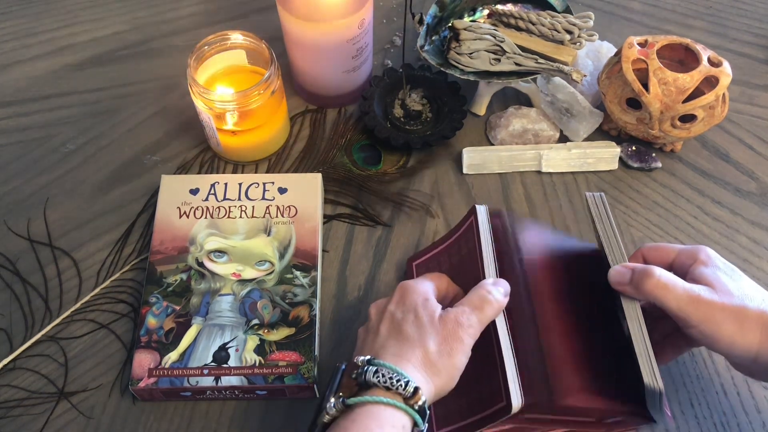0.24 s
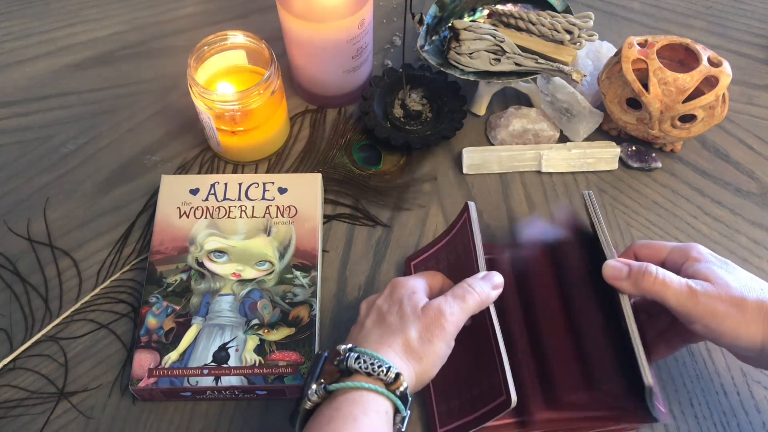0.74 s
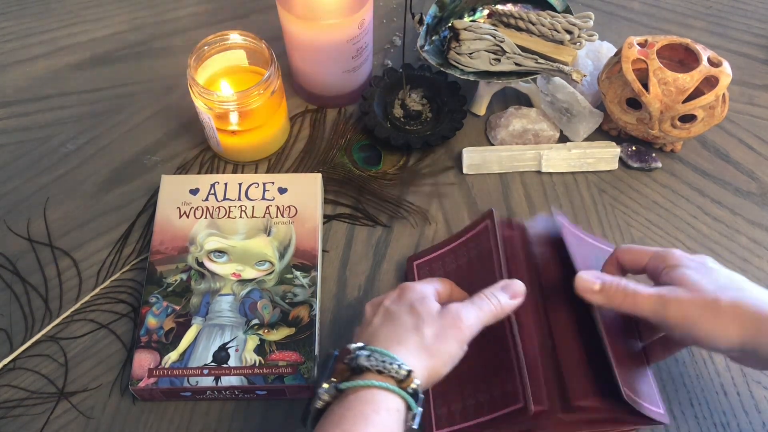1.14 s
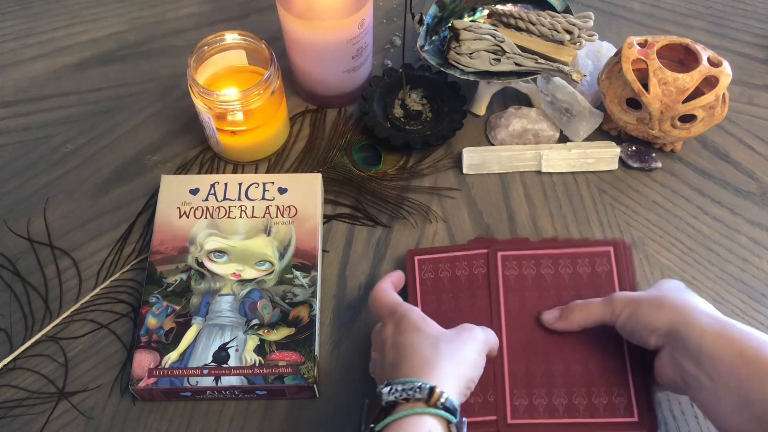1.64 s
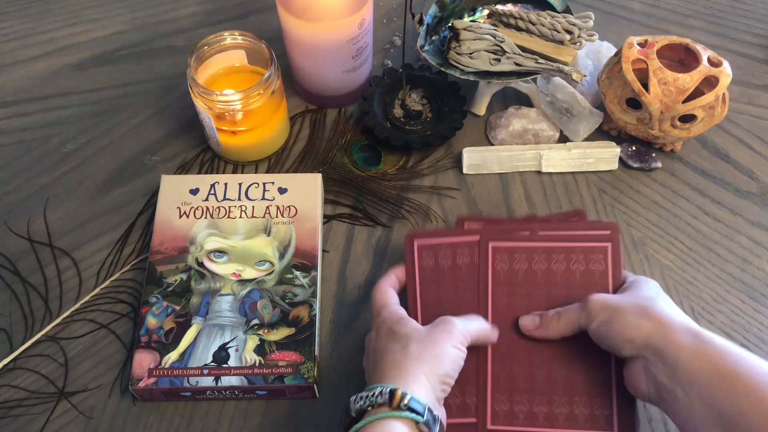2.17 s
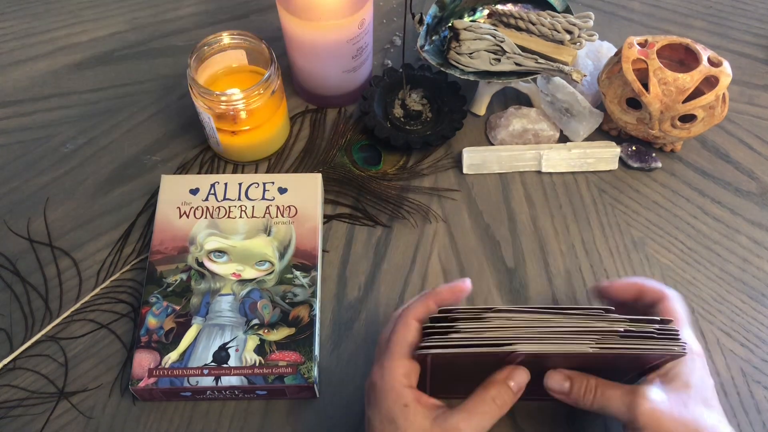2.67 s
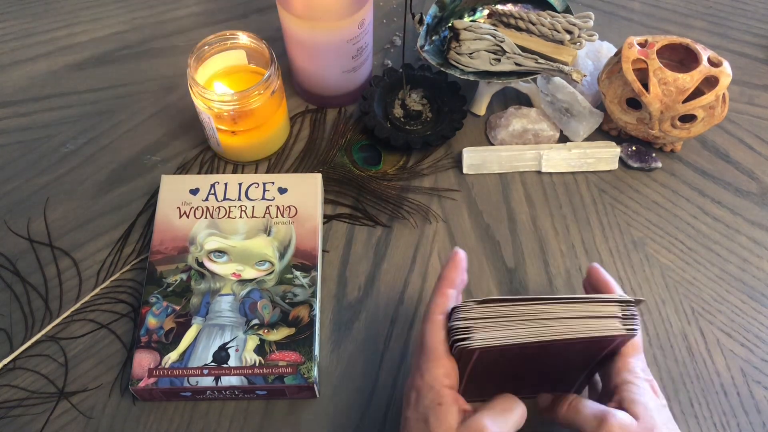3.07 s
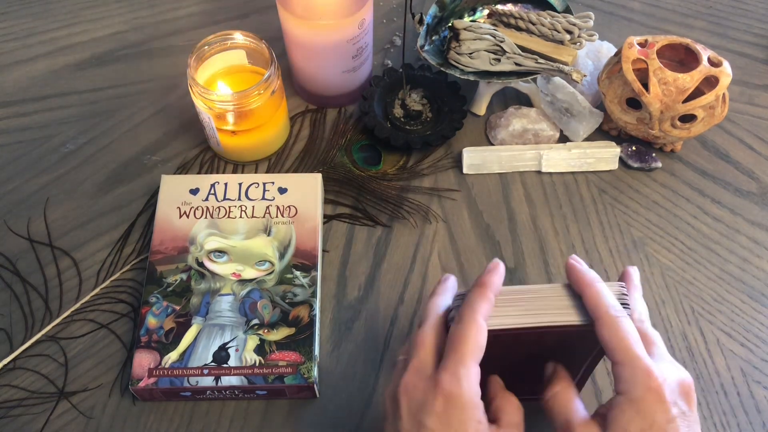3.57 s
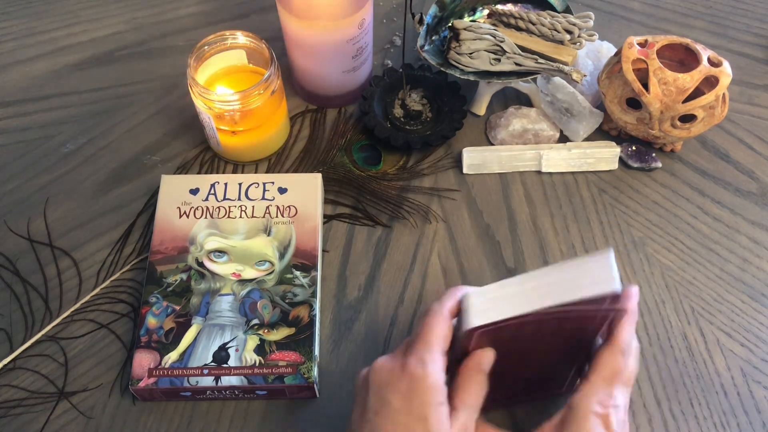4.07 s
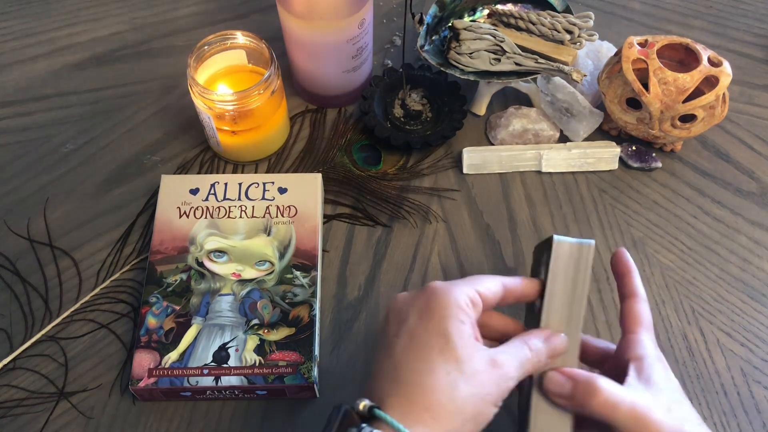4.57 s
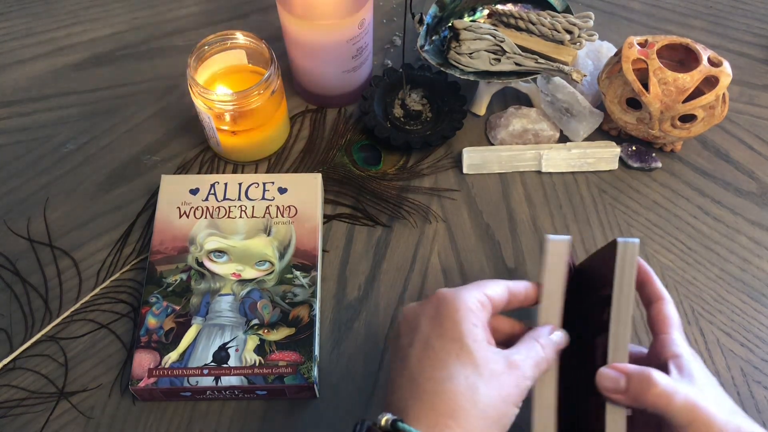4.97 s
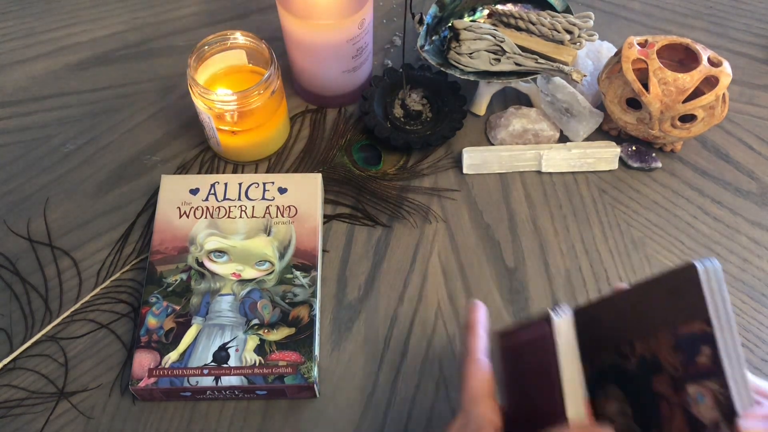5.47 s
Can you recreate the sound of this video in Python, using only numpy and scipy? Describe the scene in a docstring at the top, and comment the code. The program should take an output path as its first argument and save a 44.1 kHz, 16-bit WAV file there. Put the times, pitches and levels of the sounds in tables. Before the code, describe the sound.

A close recording in a quiet furnished room, with a low soft hum and short reflections. From 0 to 1.25 s a deck of large stiff cards is riffled: a sharp cluster of snaps in the first 0.1 s, sparse fainter ticks over papery crackle, a strong snap near 0.7 s, then denser snaps from 0.9 s, climaxing in a bright burst around 1.15-1.25 s with a dull knock. From 1.4 to 2.4 s cards slide together in short gritty swishes, with light taps around 1.5-1.85 s. The loudest wooden knocks come at 2.54-2.6 s and 2.89-3.0 s, with dragging and a brisk papery swish. Weaker taps follow near 3.12, 3.47 and 3.74 s, with small rubs. After 4 s there is a soft tick at 4.14 s, near silence, then light card slides at 5.0-5.45 s. Two faint, thin, high whistles sound at about 5.5 and 5.6 s.

```python
"""Sharp card snaps over a rustle: a deck of large cards is riffled together, pushed flush, knocked on a wooden
table and squared by hand. Corners snap off the thumbs as noise bursts with a ringing air pocket; card faces slide
as gritty friction; the deck edge thuds through the table modes and drags on the wood as coloured grit.
Two short faint whistles come near the end. A quiet furnished room and its low hum surround a close microphone."""
import sys
import numpy as np
from scipy import signal
from scipy.fft import rfft, irfft, next_fast_len
from scipy.io import wavfile
from scipy.ndimage import uniform_filter1d

SR = 44100
rng = np.random.default_rng(int(sys.argv[2]) if len(sys.argv) > 2 else 0)


def generate_wav(sig):
    """Save sig (samples, or channels by samples) to the path in sys.argv[1] as 16-bit PCM at SR."""
    pcm = np.round(np.clip(np.atleast_2d(sig).T, -1, 1) * 32767).astype(np.int16)
    wavfile.write(sys.argv[1], SR, pcm)


N = 252252


def gain_of(db):
    """Decibels to amplitude."""
    return 10 ** (np.asarray(db) / 20)


def evened(x):
    """Scales to rms 1."""
    return x / np.sqrt(np.mean(x ** 2) + 1e-20)


def peaked(x):
    """Scales to peak 1."""
    return x / abs(x).max()


def early(x):
    """Scales to rms 1 over the first 10 ms."""
    return x / np.sqrt(np.mean(x[:441] ** 2))


def read(points, hz):
    """Reads a curve over frequency on a log-frequency axis."""
    f, value = np.transpose(points)
    return np.interp(np.log(hz + 1), np.log(f + 1), value)


def along(curve):
    """The gain of a level curve at every sample; silent after its end."""
    s, db = np.transpose(curve)
    return gain_of(np.interp(np.arange(N) / SR, s, db, right=-200))


def add(mix, s, sound):
    """Mixes a sound in at a time in seconds."""
    part = mix[round(s * SR):][:len(sound)]
    part += sound[:len(part)]


def band(x, lo_hz, hi_hz, order=2):
    """Causal band-pass."""
    edges_hz = np.clip([lo_hz, hi_hz], 20, SR / 2 - 500)
    return signal.sosfilt(signal.butter(order, edges_hz, "band", fs=SR, output="sos"), x)


def resonate(x, hz, width_hz):
    """A two-pole resonance of gain 1 at its peak."""
    return signal.lfilter(*signal.iirpeak(hz, hz / max(width_hz, 1), SR), x)


def coloured(x, points):
    """Shapes a long noise by a spectrum and scales it to rms 1."""
    size = next_fast_len(len(x))
    gain = gain_of(read(points, np.fft.rfftfreq(size, 1 / SR)))
    return evened(irfft(rfft(x, size) * gain, size)[:len(x)])


# Spectrum of the room's wash. Each row: frequency in Hz, relative density in dB per Hz.
HUSH_SPECTRUM = [(15, -53), (25, -28), (43, 0.5), (150, 2), (177, -4), (208, 5), (280, -14), (410, -2.5),
                 (617, -17), (902, -16.5), (1930, -21.5), (15200, -27), (16500, -42)]
# Wavering tones in the hush. Each row: frequency in Hz, width in Hz, rms level in dB.
HUM_TONES = [(199, 4.7, -69), (1180, 8.5, -90)]
HUSH_DB, SWELL_DB = -65.5, 1.5


def hush():
    """Background of the room: low wash that swells slowly, up to microphone hiss, and narrow-band noise hums."""
    flutter = band(rng.standard_normal(N), 12, 60, order=1)
    drift = uniform_filter1d(rng.standard_normal(N), 9000)
    swell = evened(flutter + 30 * drift)
    wash = coloured(rng.standard_normal(N), HUSH_SPECTRUM) * gain_of(HUSH_DB + SWELL_DB * swell)
    hums = sum(gain_of(db) * evened(resonate(rng.standard_normal(N), hz, width_hz))
               for hz, width_hz, db in HUM_TONES)
    return wash + hums


# Decay of the room. Each row: frequency in Hz, time to fall 60 dB in s.
ROOM_T60 = [(150, 0.26), (400, 0.17), (1040, 0.35), (2760, 0.31), (7280, 0.25)]


def reflections(x):
    """Sparse echoes of random sign, one in every 20 samples; each frequency dies at its own speed."""
    taps = np.zeros(SR)
    at = np.arange(180, SR - 20, 20)
    taps[at + rng.integers(0, 20, len(at))] = rng.choice([-1., 1.], len(at))
    hz, t, z = signal.stft(taps, SR, nperseg=256)
    decay = gain_of(-60 * t / read(ROOM_T60, hz)[:, None])
    tail = signal.istft(z * decay, SR, nperseg=256)[1]
    return signal.fftconvolve(x, tail / np.linalg.norm(tail))[:N]


def diffuse_field(x):
    """Energy lingers in each frequency band and is carried by fresh noise."""
    hz, t, z = signal.stft(x, SR, nperseg=256, noverlap=192)
    keep = gain_of(-60 * t[1] / read(ROOM_T60, hz)) ** 2  # share of energy kept per frame
    energy = uniform_filter1d(abs(z) ** 2, size=3, axis=0)  # scattering blurs fine spectral detail
    # starts three frames late
    lingering = np.array([signal.lfilter([0, 0, 0, 1 - k], [1, -k], e) for k, e in zip(keep, energy)])
    a, b = rng.standard_normal((2, *z.shape))
    noise = np.sqrt(abs(lingering)) * (a + 1j * b)
    diffuse = signal.istft(noise, SR, nperseg=256, noverlap=192)[1][:N]
    return band(diffuse, 170, 20000, order=4)


def room(x):
    """The furnished room answers with sparse reflections and a diffuse field."""
    return .45 * reflections(x) + diffuse_field(x)


# Thin faint whistle, one list per note. Each row: time in seconds, pitch in Hz, rms level in dB.
WHISTLE_NOTES = [
    [(5.51, 3125, -88), (5.538, 3330, -72), (5.56, 3300, -89)],
    [(5.61, 3410, -71.5), (5.63, 3510, -74), (5.72, 3380, -73.5)],
]


def whistle():
    """Short gliding sines with soft ends."""
    out = np.zeros(N)
    for rows in WHISTLE_NOTES:
        s, hz, db = np.transpose(rows)
        t = np.arange(s[0], s[-1], 1 / SR)
        phase = 2 * np.pi * np.cumsum(np.interp(t, s, hz)) / SR
        tone = np.sin(phase) * np.sqrt(2)  # rms 1
        add(out, s[0], gain_of(np.interp(t, s, db)) * tone * signal.windows.tukey(len(t), .15))
    return out


def grit(per_s, spread_db, smooth):
    """Stick-slip friction: smooth noise plus small catches, of uneven size where spread_db is above 0."""
    sizes = gain_of(spread_db * np.minimum(rng.exponential(1, N), 4))
    catches = sizes * (rng.random(N) < per_s / SR)
    clumps = signal.lfilter([1], [1, -np.exp(-1000 / (1.5 * SR))], catches)  # each catch decays over 1.5 ms
    return evened(rng.standard_normal(N) * (smooth + evened(clumps)))


# Deck and hands dragging on the wood. Each row: time in seconds, level in dB.
DRAG_LEVEL = [(0.0, -59), (0.62, -55), (0.76, -60), (1.13, -54.5), (1.21, -50.5), (1.46, -61.5),
              (2.16, -64), (2.53, -59), (2.69, -50), (2.87, -63), (2.9, -53), (3.06, -51.5), (3.45, -68.5),
              (3.64, -56.5), (4.62, -64), (5.72, -65)]
# Spectrum of the drag. Each row: frequency in Hz, relative density in dB per Hz.
WOOD_SPECTRUM = [(71, -42.5), (120, -7), (189, 0.5), (394, 2.5), (456, 0.5), (484, -2.5), (649, -6.5),
                 (1710, -17), (4000, -32), (5200, -42.5), (8800, -120)]


def drag():
    """The deck edge rasps on the wood: dense grit with the colour of the wood."""
    return along(DRAG_LEVEL) * coloured(grit(per_s=890, spread_db=4.0, smooth=2.6), WOOD_SPECTRUM)


# Modes of the table top. Each row: frequency in Hz, width in Hz (70 at least when played), relative gain in dB.
TABLE_MODES = [(334, 166, 11), (504, 410, -4), (950, 1000, 2.5), (1225, 41, -30), (1320, 210, 10.5),
               (1620, 160, -42), (2220, 54, -52), (2655, 120, -55)]


def table(x):
    """The table top rings in its modes over a broad wooden body; wood swallows the treble."""
    modes = sum((-1) ** k * gain_of(db) * resonate(x, hz, max(width_hz, 70))
                for k, (hz, width_hz, db) in enumerate(TABLE_MODES))
    return band(modes + 1.7 * x, 207, 2480, order=4)


def papery(rub, hiss_db, ring, hz):
    """Friction on coated card: a broad rub, a ring of the bent card and a treble hiss."""
    bending = sum(resonate(rub, share * hz, 0.13 * hz) for share in (.45, .72, 1))  # three modes
    body = evened(band(rub, 1400, 8000)) + ring * evened(bending)
    hiss = evened(band(rub, 5300, 16000)) + 0.22 * evened(band(rub, 12500, 15500))
    return evened(body) + gain_of(hiss_db) * evened(hiss)


# Card faces sliding. Each row: start in seconds, length in seconds, rub level at full speed in dB,
# treble hiss in dB re rub, table rumble in dB re rub, top mode of the bent card in Hz.
SLIDE_STROKES = [(1.3, 1.36, -70, -8, -17, 2970), (1.437, 0.14, -57.5, -5.5, -28, 3420),
                 (1.59, 0.18, -51, 2.5, -18, 6200), (1.9, .09, -58, -3, -1, 3560),
                 (2.013, 0.19, -61.5, -2, 2, 2820), (2.215, 0.12, -60, -5, 1.5, 2730),
                 (2.308, 0.23, -53, -5, -18, 1990), (2.378, 0.098, -58, -33, 8, 4460),
                 (2.5, 0.086, -52.5, -9, -9, 3200), (2.856, .2, -42.5, 0.5, -14, 2690),
                 (3.052, .13, -55, -14, -0.5, 2500), (3.183, 0.061, -69.5, 2, -4, 2580),
                 (3.43, 0.082, -62, 5, 15.5, 2400), (3.506, 0.053, -64.5, 6, 14, 6950),
                 (3.692, 0.088, -54.5, -1.5, 4.5, 2870), (3.79, 0.28, -74, 3, 2, 3530),
                 (4.09, 0.089, -68, -2, 2, 2700), (4.224, 0.14, -65.5, -7, 4.5, 4600),
                 (4.36, 0.18, -80.5, 11.5, 13, 3500), (4.93, .1, -80.5, -10, 3, 2900),
                 (5.068, .11, -64.5, -7, 0, 3470), (5.271, 0.079, -64, -0.5, -21, 1990),
                 (5.348, 0.11, -55.5, -8, -10, 3760)]
FASTEST_AT = 0.5  # share of the stroke
RING_SHARE, RING_DB_PER_HISS_DB = 0.29, -1.1  # a light fast skim hisses, a pressed card rings


def slides():
    """Each stroke speeds up and slows down; loudness follows its speed, and the table under the deck rumbles."""
    out, rub = np.zeros(N), grit(per_s=390, spread_db=0.0, smooth=1.5)
    for start_s, length_s, rub_db, hiss_db, rumble_db, hz in SLIDE_STROKES:
        at = round(start_s * SR) + np.arange(round(length_s * SR))
        angle = np.interp(np.linspace(0, 1, len(at)), [0, FASTEST_AT, 1], [0, np.pi / 2, np.pi])
        speed = np.sin(angle)
        rumble = gain_of(rumble_db) * evened(table(resonate(rub[at], 534, 400)))
        ring = RING_SHARE * gain_of(RING_DB_PER_HISS_DB * hiss_db)
        sound = papery(rub[at], hiss_db, ring, hz) + rumble
        add(out, start_s, gain_of(rub_db) * sound * abs(speed) ** 1.98)
    return out


# Cards fluttering past the thumbs. Each row: time in seconds, rustle gain in dB.
RIFFLE_LEVEL = [(0.03, -70), (0.106, -48), (0.3, -66.5), (0.4, -58), (0.49, -58), (0.52, -52),
                (0.72, -54.5), (0.9, -66.5), (0.91, -47.5), (1.16, -54), (1.337, -55), (1.44, -67.5)]
RIFFLE_HISS_DB = -7  # treble re rustle


def riffle():
    """Fine crackle of card edges between the snaps; gaps of different width ring at different pitch."""
    edges = [grit(per_s=120, spread_db=4.2, smooth=.45) for _ in range(4)]
    pockets = [papery(rub, RIFFLE_HISS_DB, 1.2, hz) for rub, hz in zip(edges, (2020, 3150, 4200, 6500))]
    return along(RIFFLE_LEVEL) * sum(pockets) / 2


def burst(decay_ms, rise_ms):
    """Noise that starts fast and dies exponentially, in clumps as one card lands after another."""
    ms = np.arange(6000) * 1000 / SR
    unevenness = evened(uniform_filter1d(rng.standard_normal(len(ms)), size=50))
    clumps = gain_of(3.35 * unevenness)
    shape = (1 - np.exp(-ms / abs(rise_ms))) * np.exp(-ms / max(decay_ms, .3))
    return rng.standard_normal(len(ms)) * clumps * shape


# Lowest modes of the table top. Each row: frequency in Hz, width in Hz, relative gain in dB.
THUD_MODES = [(157.8, 15, -8.5), (206.2, 27, 1.5)]
KNOCK_CRACK_DB = -32.5  # early rms re body peak


def knock(db, thud_db, hz, decay_ms):
    """Many card edges land close together: a dull burst into the table, a short crack, a low thud of the top."""
    blow = burst(decay_ms, rise_ms=0.074) + 1.54 * burst(0.8, rise_ms=0.075)  # the first edge lands hardest
    deck_ring = resonate(resonate(blow, hz, 0.21 * hz), hz, 0.21 * hz)
    body = peaked(table(blow)) + 0.4 * peaked(deck_ring)
    crack = early(band(burst(0.71 * decay_ms, rise_ms=1.4), 2900, 19500))
    push = np.exp(-np.arange(len(blow)) / 25.0)  # decays over 25 samples
    low_modes = sum(gain_of(mode_db) * resonate(push, f, width_hz) for f, width_hz, mode_db in THUD_MODES)
    thud = early(band(low_modes, 125, 320))
    return gain_of(db) * (peaked(body) + gain_of(KNOCK_CRACK_DB) * crack + gain_of(thud_db) * thud)


# Deck edge on the table. Each row: start in seconds, body peak in dB, early thud rms in dB re that peak,
# ring of the deck in Hz, burst decay in ms.
KNOCK_EVENTS = [(1.228, -28, -34, 1152, 33), (1.525, -45, -4.5, 1030, 2.4), (1.659, -39, -39, 1260, 2.6),
                (1.689, -34.5, -34, 1140, 2.8), (1.731, -47, -28, 1250, 3.2), (1.844, -36, -18.5, 900, 2.4),
                (2.54, -21.5, -32, 766, 2.9), (2.558, -15.5, -42, 870, 8.5), (2.566, -18, -24, 720, 1.3),
                (2.591, -23, -13.5, 840, 2.8), (2.74, -36.5, -16, 686, 5.3), (2.885, -19, -34, 760, 5.6),
                (2.903, -19.5, -32, 1370, 2.9), (2.929, -29, -12, 800, 8.1), (2.953, -23, -39, 1460, 9.3),
                (2.962, -26.5, -14, 1650, 3.7), (3, -30, -20, 1260, 7.9), (3.117, -33.5, -20, 720, 14),
                (3.439, -43.5, -28, 1430, 9), (3.474, -31, -12.5, 1420, 6.9), (3.744, -36, -14.5, 710, 3.7),
                (3.902, -54.5, -3, 710, 5.9), (4.138, -51, 7.5, 583, 1.3)]


def knocks():
    """Places every knock of the deck edge."""
    out = np.zeros(N)
    for s, *row in KNOCK_EVENTS:
        add(out, s, knock(*row))
    return out


# a small pocket snaps brighter: early treble rms re peak for a 3 kHz pocket at -30.5 dB, slope with pocket pitch
SNAP_TREBLE_DB, TREBLE_DB_PER_OCTAVE = -15.5, 3
TREBLE_DB_PER_DB = 0.1127  # a harder snap is brighter too


def snap(db, puff_db, hz, decay_ms):
    """A corner slaps the card below: broad crack, a pocket of air between cards rings, a low puff escapes."""
    treble_db = SNAP_TREBLE_DB + TREBLE_DB_PER_OCTAVE * np.log2(hz / 3000) + TREBLE_DB_PER_DB * (db + 30.5)
    crack = burst(decay_ms, rise_ms=0.79)
    pocket = resonate(crack, hz, 0.067 * hz)
    middle = peaked(band(crack, 1500, 6100)) + 0.5 * peaked(pocket)
    treble = early(band(burst(decay_ms, rise_ms=0.18), 6800, 19920, order=1))
    puff = early(band(burst(1.4 * decay_ms, rise_ms=1.3), 360, 980))
    return gain_of(db) * (peaked(middle) + gain_of(treble_db) * treble + gain_of(puff_db) * puff)


# Card snaps. Each row: start in seconds, crack peak in dB, early air puff rms in dB re that peak,
# pocket resonance in Hz, burst decay in ms.
SNAP_EVENTS = [(0.0337, -25, -16, 2820, 6.2), (0.042, -15.5, -24.5, 3780, 2.2),
               (0.0485, -18.5, -18, 2820, 3.2), (0.068, -23, -16, 4230, 7.9),
               (0.0963, -21.5, -24, 1940, 5.2), (0.1095, -31, -10.5, 2860, 10.7),
               (0.179, -38.5, -28, 2900, 1.6), (0.2439, -41.5, -35, 1710, 1.1),
               (0.316, -43, -18, 3600, 3.7), (0.3239, -39.5, -9.5, 7800, 3.9),
               (0.3494, -39.5, -18, 2400, 1.5), (0.376, -45, -27, 3310, 6.1), (0.396, -38, -14, 3670, 7.2),
               (0.42, -37, -36, 3770, 3.3), (0.4429, -36.5, -13, 6350, 2), (0.514, -31, -12.5, 5660, 1.4),
               (0.5229, -37.5, -6.5, 1600, 7), (0.5386, -31.5, -28, 2760, 3.7),
               (0.567, -35.5, -16, 6510, 1.7), (0.5748, -29, -26, 1740, 0.58),
               (0.596, -34.5, -13, 2090, 2.5), (0.66, -26.5, -18, 6400, 2.4), (0.67, -37, -13, 2340, 4.5),
               (0.7139, -18, -18, 1370, 1.3), (0.7911, -36, -21.5, 3290, 17),
               (0.853, -37.5, -12.5, 2640, 3.1), (0.906, -29, -18, 1560, 7.6),
               (0.9163, -23.5, -12, 4000, 1.8), (0.9206, -19, -27.5, 4100, 4),
               (0.9351, -26.5, -17, 3400, 2.9), (0.97, -34, -23, 3520, 5.2), (0.9786, -31, -9, 1410, 2.4),
               (0.9991, -30, -25.5, 3620, 4.1), (1.038, -24, -13.5, 1430, 7.2),
               (1.0465, -33.5, -8, 2650, 2.4), (1.1096, -40, -6.5, 1840, 3.3),
               (1.1413, -35.5, -17.5, 4090, 1), (1.1518, -20, -24, 4640, 3.2),
               (1.1814, -18.5, -14.5, 7400, 8.8), (1.1874, -18.5, -17.5, 5390, 8),
               (1.2039, -18.5, -17.5, 7000, 3.3), (1.2197, -13.5, -16.5, 3670, 7.3),
               (1.2301, -20, -28.5, 4120, 5.1), (1.8306, -46.5, -6.5, 1390, 1.4),
               (1.845, -48, -28, 2620, 3.6), (2.0576, -40, -22, 1280, 1.24), (2.079, -36, -16.5, 1550, 2.5),
               (2.8868, -26, -21, 4360, 2.9), (3.3955, -51, -35, 3000, 2.7), (3.474, -45, -34, 6940, 2.5),
               (4.1383, -38.5, -29, 2520, 3.2), (4.3302, -48.5, -20, 5600, 1.5), (4.355, -53, -25, 2540, 2),
               (5.3753, -46, -16, 3080, 2.3), (5.457, -50, -15, 5150, 3.4), (5.639, -55, -25, 7500, 1.2)]


def snaps():
    """Places every snap of a card corner."""
    out = np.zeros(N)
    for s, *row in SNAP_EVENTS:
        add(out, s, snap(*row))
    return out


def scene():
    """Snaps, knocks and slides close by, with the room behind them."""
    snapping, knocking = snaps(), knocks()
    rubbing = slides() + riffle() + drag()
    wet = room(gain_of(-8) * snapping + gain_of(1) * knocking + gain_of(-6) * rubbing)
    return (snapping + knocking + rubbing + wet + whistle() + hush())[None]


EDGE_HZ = 16100


def record(dry):
    """The band limit of the recorder: a linear-phase low-pass."""
    lowpass = signal.firwin(511, EDGE_HZ, window=("kaiser", 9), fs=SR)
    return signal.oaconvolve(dry, lowpass[None], "same")


dry = scene()
out = record(dry)
generate_wav(out)
```